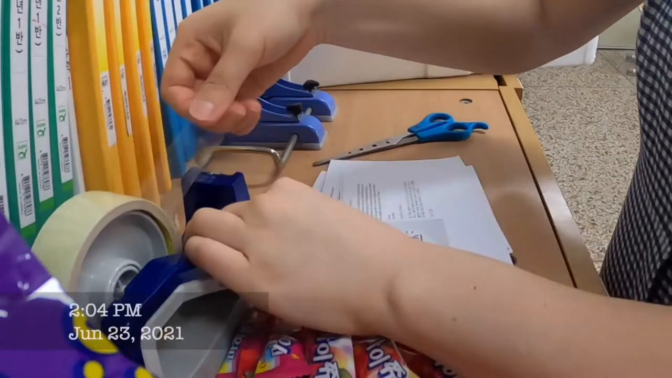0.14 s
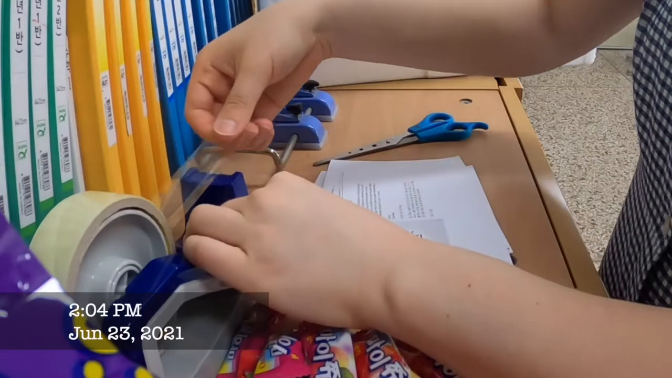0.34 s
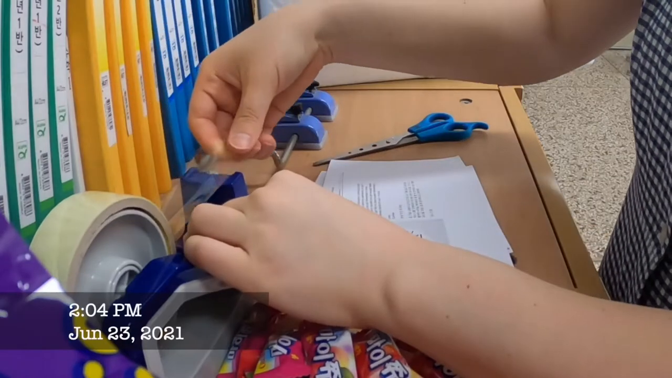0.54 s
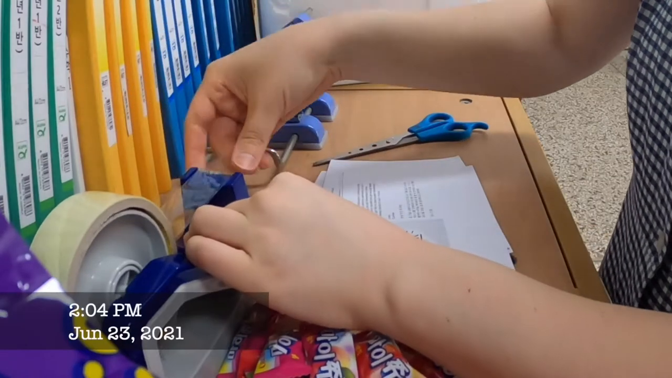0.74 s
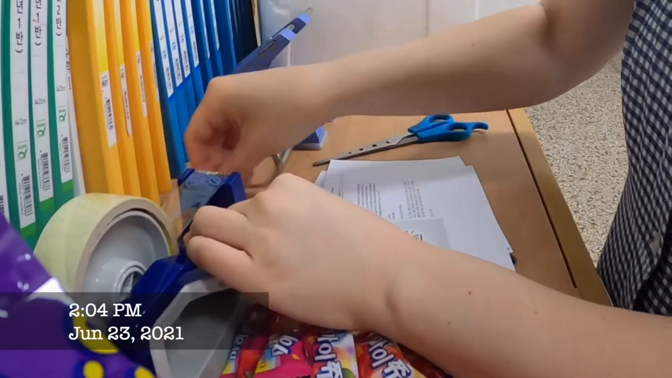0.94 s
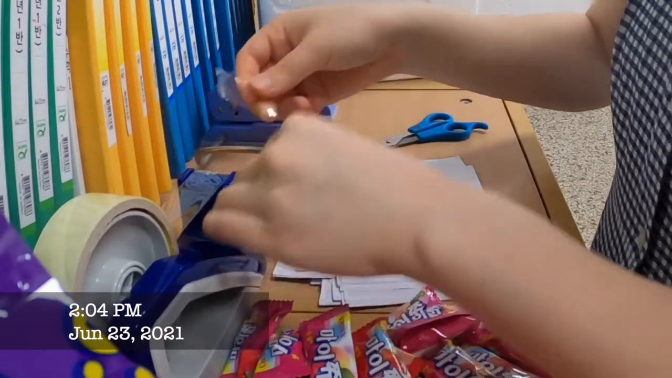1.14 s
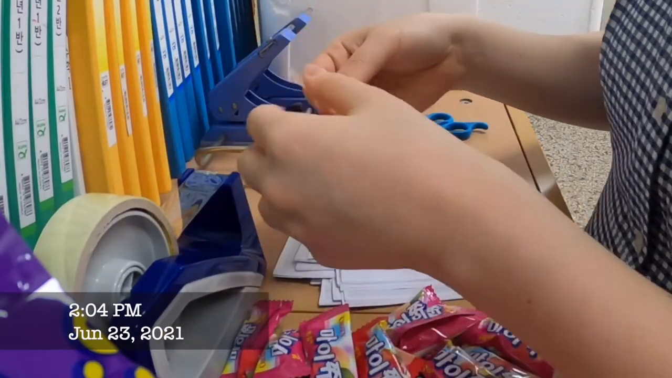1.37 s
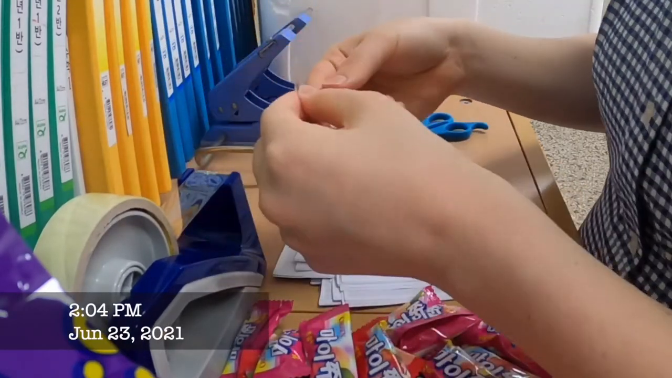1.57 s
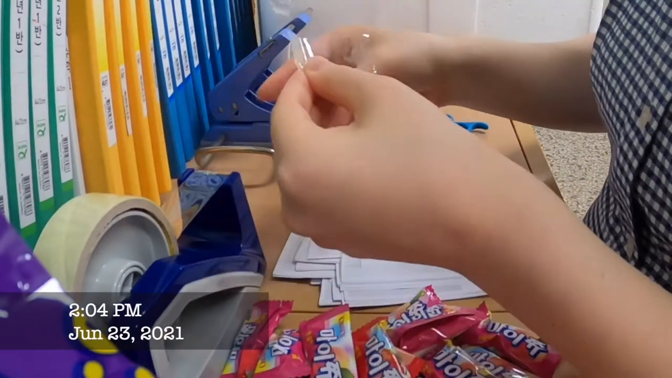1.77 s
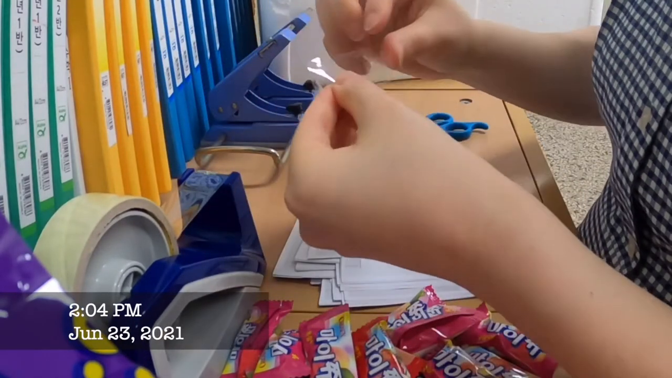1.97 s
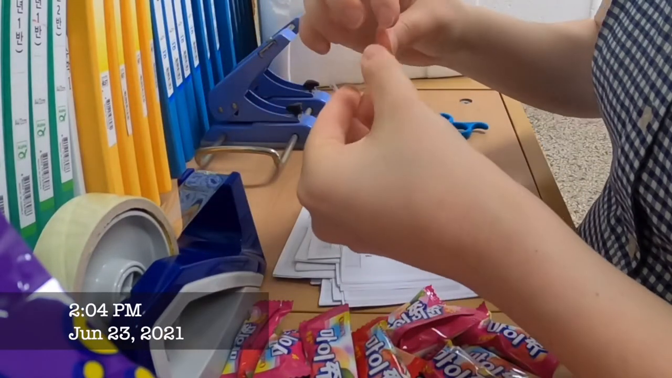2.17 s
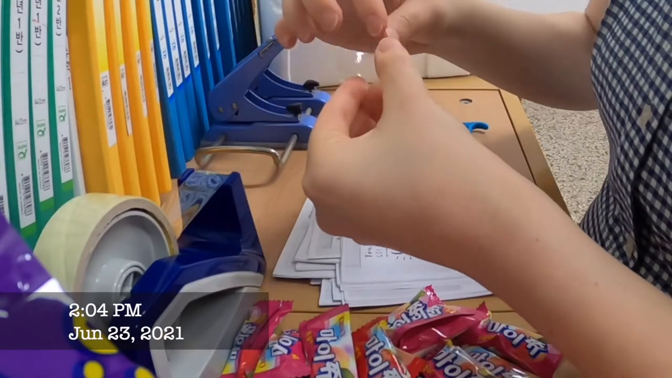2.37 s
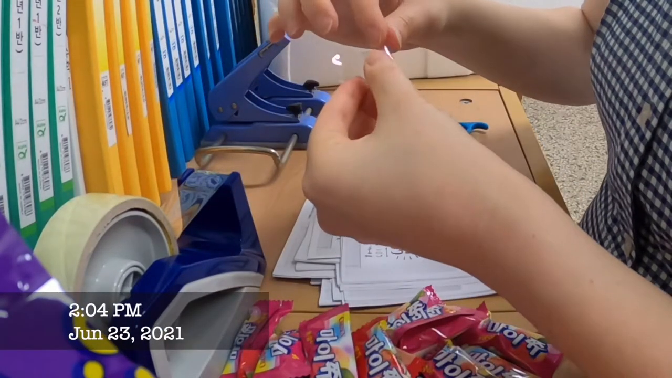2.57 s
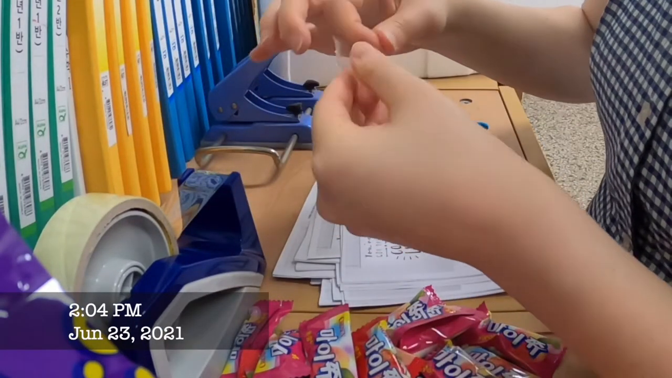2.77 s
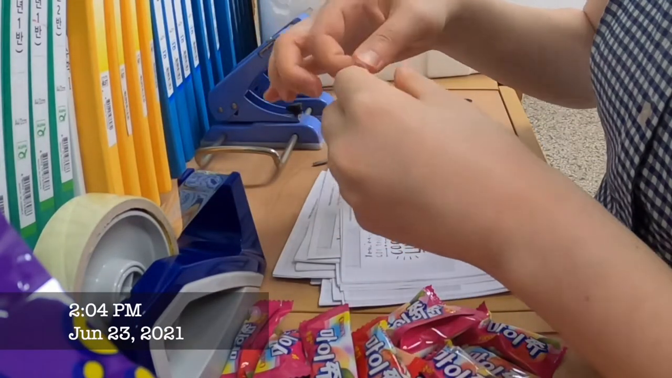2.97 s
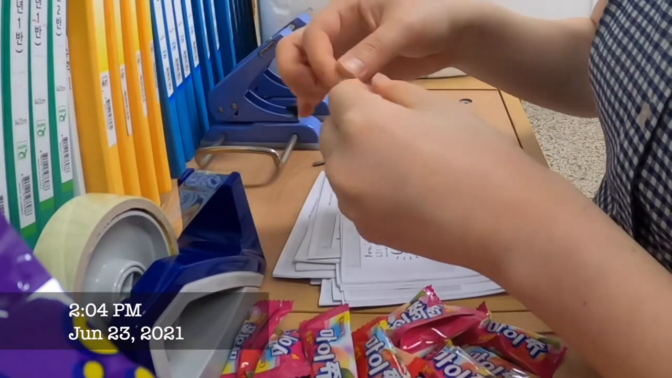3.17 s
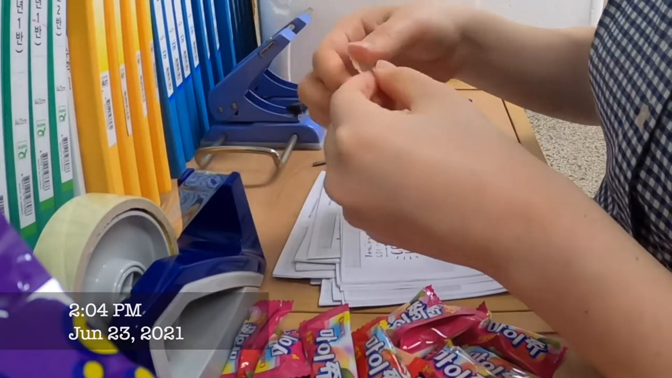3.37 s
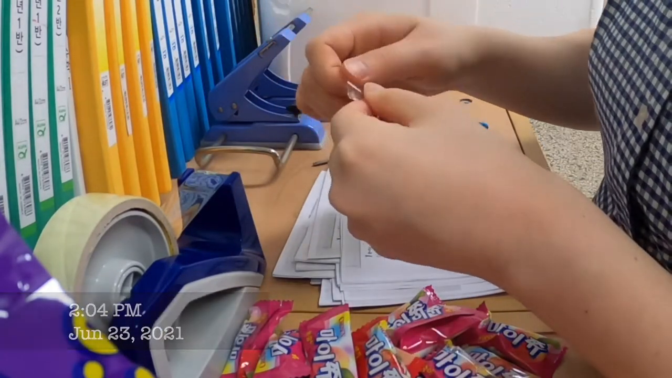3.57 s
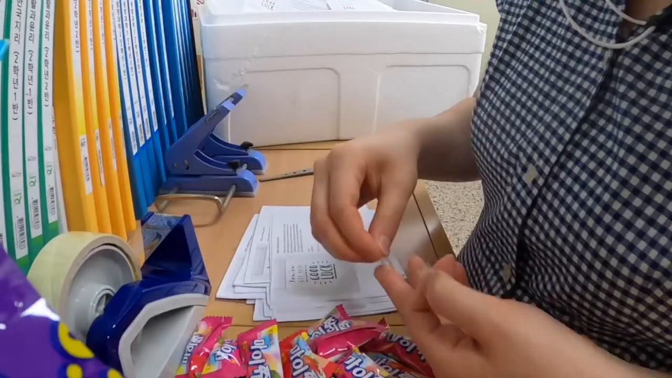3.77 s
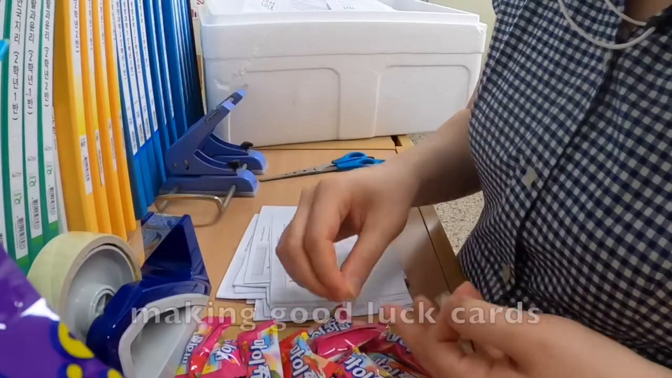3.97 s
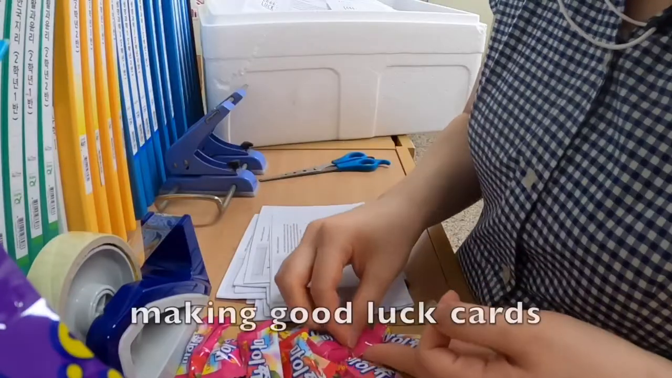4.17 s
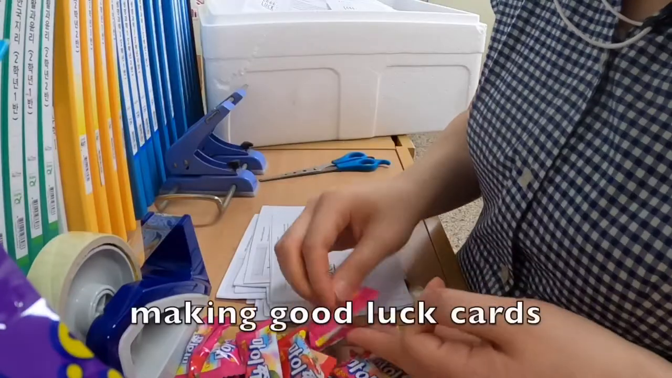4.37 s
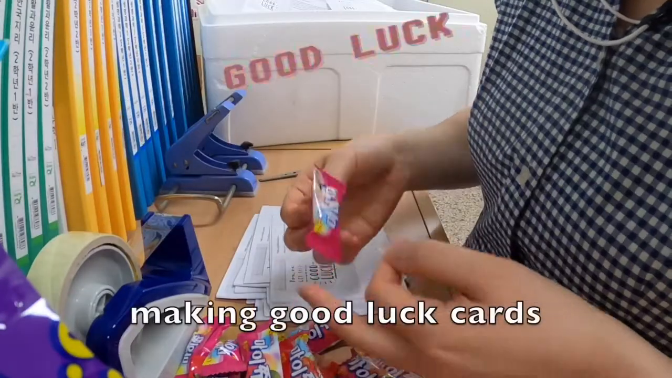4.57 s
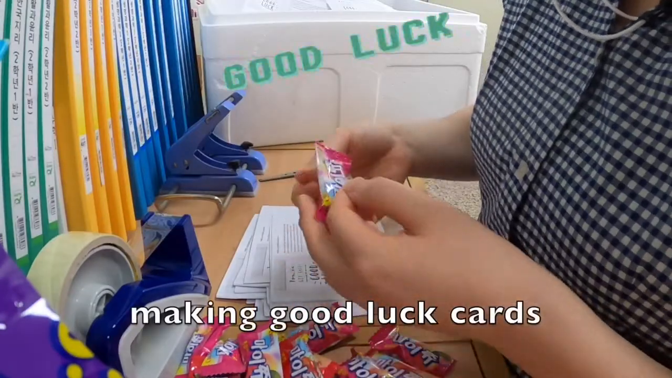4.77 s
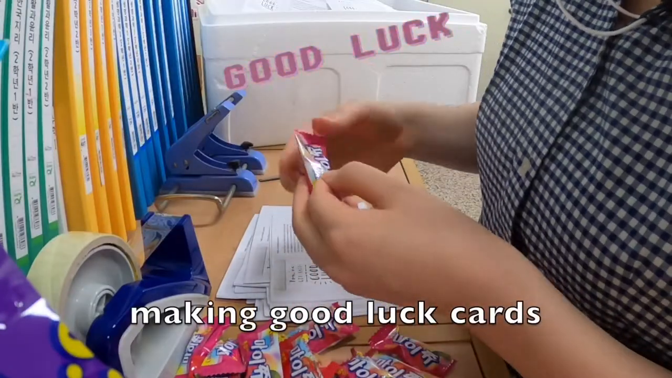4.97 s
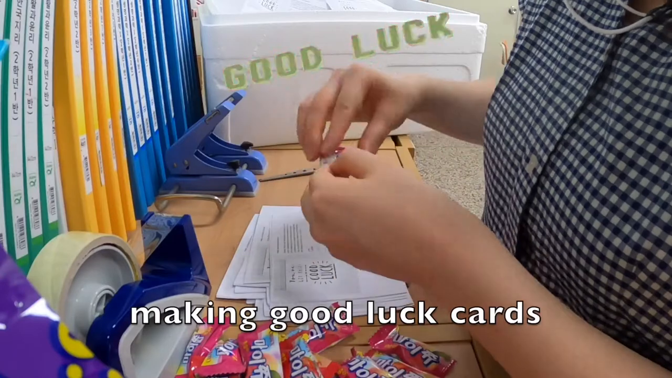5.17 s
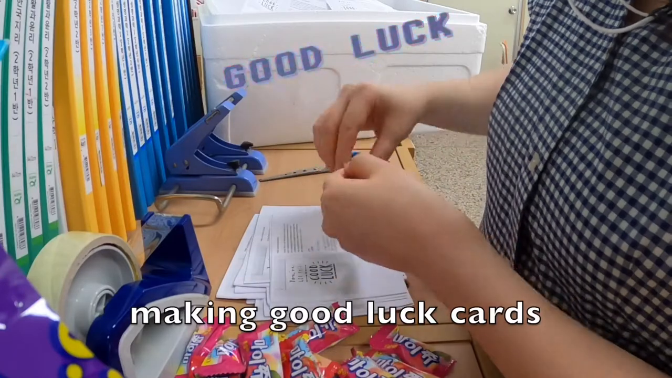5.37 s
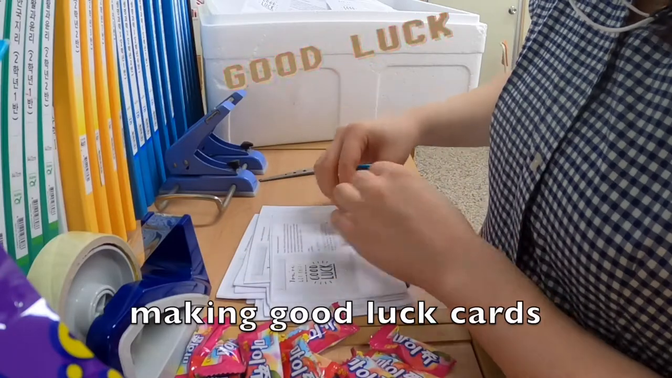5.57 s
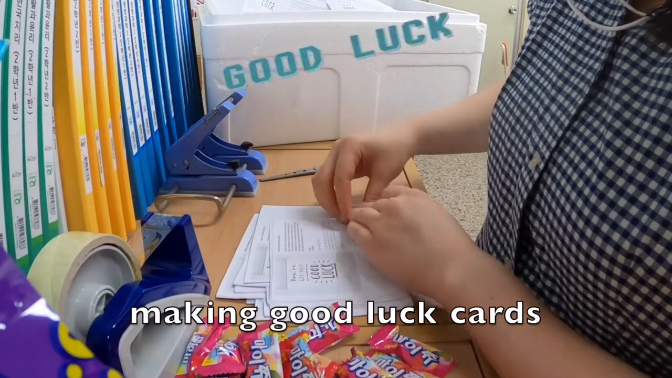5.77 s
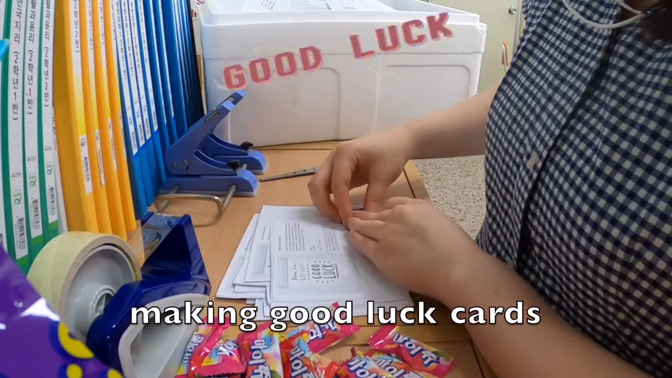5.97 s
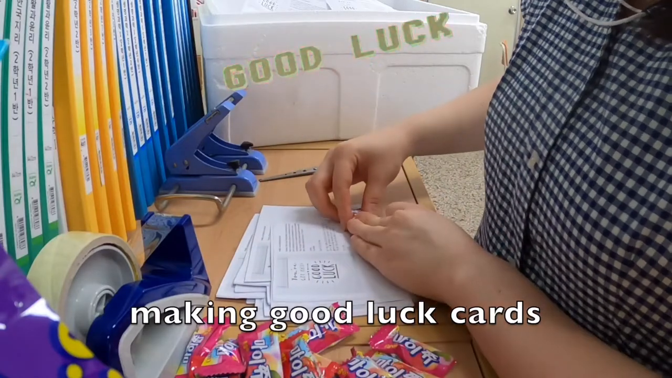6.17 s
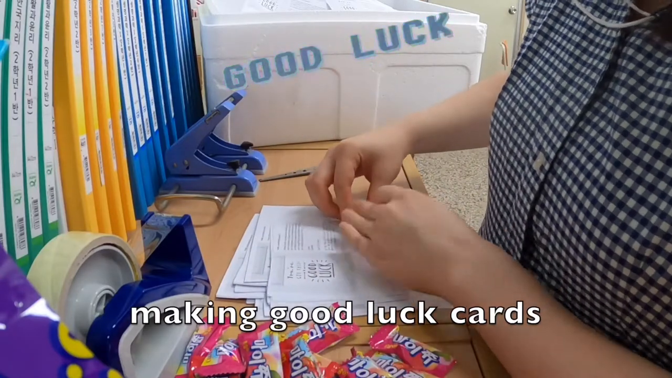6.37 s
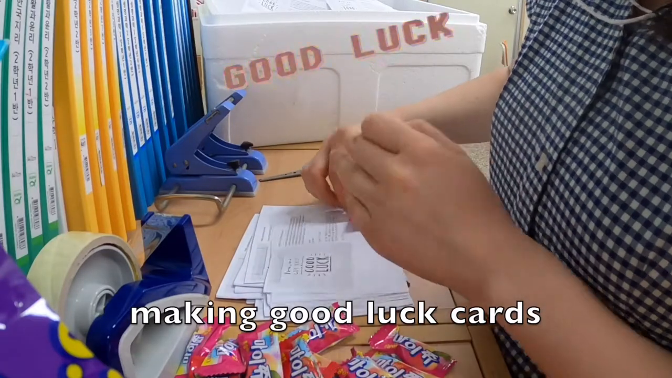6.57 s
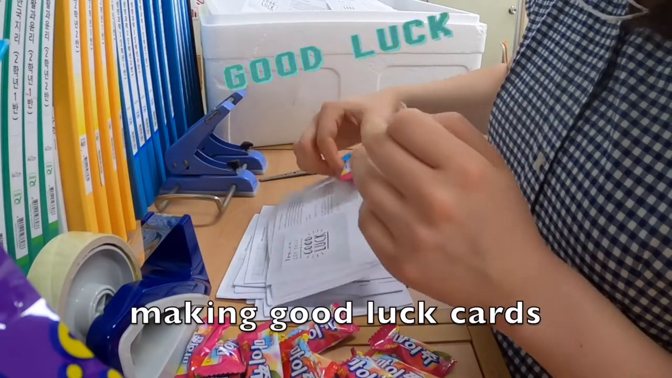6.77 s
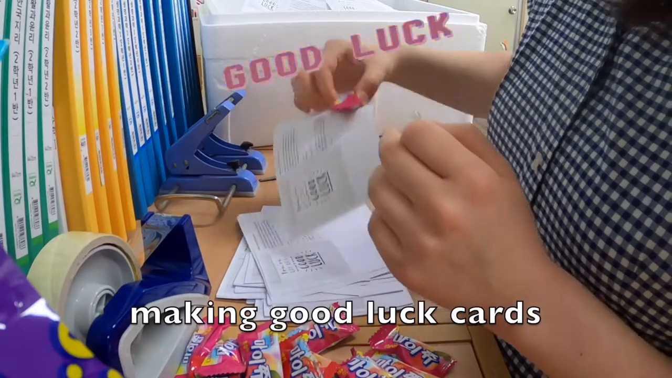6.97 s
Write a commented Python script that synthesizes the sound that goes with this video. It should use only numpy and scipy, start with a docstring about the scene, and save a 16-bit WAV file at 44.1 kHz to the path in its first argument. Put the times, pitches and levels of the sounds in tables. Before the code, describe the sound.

In a small office, clear tape is pulled off a plastic desk dispenser with a brief crackling rip, rocking it against the desk. The strip snaps on the cutter with a thud. Faint ticks and rubs follow as fingers handle the tape. Then plastic candy wrappers crinkle sharply, easing into scattered crackles and soft paper rustling. Everything sounds close, over a low ventilation hum.

```python
"""Clear tape pulled off a plastic desk dispenser and snapped on its cutter, in a small office.
The glue sticks and slips; each slip cracks the tape and rings the dispenser, which rocks on the desk.
Fingers then loop the strip, pick a wrapped sweet from a pile and press it on a paper card.
Film facets buckle and tick, sliding films catch in tiny grains, and the ventilation hums throughout."""
import sys
import numpy as np
from scipy import signal
from scipy.fft import rfft, irfft
from scipy.io import wavfile

SR = 44100
rng = np.random.default_rng(int(sys.argv[2]) if len(sys.argv) > 2 else 0)


def bounce(signal):
    """Save signal as a 16-bit WAV file at the path given by the first command-line argument."""
    frames = np.transpose(np.atleast_2d(signal))
    limited = np.clip(frames, -1, 1)
    pcm = np.round(limited * 32767).astype(np.int16)
    wavfile.write(sys.argv[1], SR, pcm)


N = 309582

# Ventilation air. Each row: frequency in Hz, relative spectral density in dB.
AIR_SPECTRUM = [(20, -13.5), (40, -8.5), (55, 0), (75, -0.5), (120, -4), (200, -6.5), (270, -15.5),
                (450, -17.5), (600, -25.5), (1100, -23.5), (2200, -34.5), (4000, -37.5), (7000, -39),
                (16000, -64.5)]
# Ventilation motor. Each row: frequency in Hz, RMS level in dB.
MOTOR_HUM = [(59.2, -61.5), (118.4, -62)]
# Fingers on tape and paper. Each row: start and end in seconds, level in dB, tilt in dB/octave.
FINGER_STROKES = [(0, 0.078, -54.5, -0.5), (0.663, 0.757, -59, 2), (1.031, 1.157, -62, -2.5),
                  (1.499, 1.67, -66, -4), (1.623, 1.762, -57.5, -0.5), (2.605, 2.757, -65.5, -1.5),
                  (2.904, 2.997, -65.5, -4.5), (3.214, 3.269, -56.5, 2.5), (3.322, 3.458, -58.5, -6),
                  (3.527, 3.717, -64, -6), (6.044, 6.43, -63, -5), (6.847, 7.024, -60, -1)]
# Radiation of wrapper film, also used for all rubbing. Each row: frequency in Hz, gain in dB.
WRAPPER_SPECTRUM = [(150, -26.5), (400, -3.5), (750, -7), (1100, 3.5), (1500, 1), (2500, 3.5), (4000, 2.5),
                    (6000, 0), (8000, -3), (10000, -8), (13000, -18), (16000, -34.5)]
# Radiation of tape. Each row: frequency in Hz, gain in dB.
TAPE_SPECTRUM = [(70, -21), (300, 4), (1000, 5), (1500, 5), (4000, 0), (6000, 1.5), (8000, -2),
                 (10000, -11), (13000, -17.5), (16000, -26.5)]
# Dispenser and desk. Each row: frequency in Hz at pitch ratio 1, relative level in dB, T60 in seconds.
DISPENSER_MODES = [(140.9, -7, 0.088), (191.6, -0.5, 0.081), (195, -11.5, .2), (239, -3.5, 0.052),
                   (324, 0, 0.056), (430, -8.5, .07), (590, -6.5, 0.054), (735, 0.5, 0.037),
                   (1174, -5.5, 0.069), (1264, 2.5, 0.035), (1800, -16, .04), (2340, -8.5, .04),
                   (2688, -1, 0.055), (3640, -6.5, 0.021)]
# Tape tugging the dispenser. Each row: start in seconds, peak in dB.
TAPE_TUGS = [(0.012, -32), (0.0716, -21), (0.1932, -13), (0.2229, -16), (0.284, -20)]
# Lone slips around the fast pull. Each row: start in seconds, energy in dB, ring in Hz, tilt in dB/octave.
LONE_SLIPS = [(0.0658, 0, 6370, 0), (0.0944, -1.5, 5880, 0.5), (0.1305, 1, 2697, 0.5), (0.143, -1, 4420, 1),
              (0.2727, 0.5, 4130, -1)]
# Course of the fast pull. Each row: time in seconds, slips per second, slip energy in dB.
FAST_PULL = [(0.151, 150, -4), (0.162, 220, -2.8), (0.174, 244, -1), (0.197, 205, -3), (0.234, 195, -3),
             (.268, 182, -6)]
# Dispenser landings. Each row: thud time in seconds, peak in dB, pitch ratio, edge lead in seconds.
LANDINGS = [(0.3672, -15.5, 0.854, 0.00094), (.9418, -9, 1.05, 0.00322)]
# Strip on cutter and fingers. Each row: start in seconds, energy in dB, ring in Hz.
STRIP_TICKS = [(.73, -14.5, 5230), (0.8343, -30.5, 3500), (.8975, -30, 3870), (1.5369, -27, 3000),
               (1.573, -31, 2960), (1.6703, -13.5, 4170), (1.7315, -12.5, 8800), (2.107, -32.5, 2830),
               (2.2796, -33, 2870), (2.606, -33, 6810), (2.8367, -23.5, 3500), (2.9277, -34, 3280),
               (3.2343, -29.5, 3460), (3.2415, -21, 5500), (3.2616, -27.5, 1255), (3.4903, -32, 4370),
               (3.694, -34, 8930)]
# Big creases of wrappers and card. Each row: start in seconds, energy in dB, ring in Hz.
BIG_CREASES = [(4.1083, -29, 4000), (4.1384, -4, 4300), (4.147, -7, 3580), (4.1644, -2, 1900),
               (4.188, -4.5, 3180), (4.2252, -15, 3600), (4.294, -12.5, 2800), (4.3335, -11.5, 3480),
               (4.4093, -18, 7260), (4.437, -15, 1580), (4.5028, -16, 1480), (4.5569, -18.5, 5240),
               (4.565, -12, 3800), (4.6168, -15.5, 4630), (4.6505, -19.5, 11400), (4.757, -13.5, 7000),
               (4.7735, -22, 5450), (4.9049, -27.5, 3480), (5.036, -23, 7250), (5.3232, -26, 6500),
               (5.3809, -17.5, 2000), (5.3995, -18, 9600), (5.4414, -16, 6600), (5.558, -30, 1180),
               (5.6297, -29.5, 2450), (5.7186, -22.5, 2150), (5.7893, -12.5, 4230), (5.8349, -14, 6940),
               (5.8569, -11, 6000), (6.0217, -13, 4900), (6.1445, -20, 1050), (6.3989, -13.5, 1130),
               (6.4423, -17, 7000), (6.501, -16.5, 2660), (6.6885, -23.5, 1180), (6.7512, -19, 6860)]
# Fingers squeezing a wrapper. Each row: start and end in seconds, grip level in dB.
SQUEEZES = [(4.116, 4.231, -37.5), (4.272, 4.381, -42.5), (4.39, 4.522, -49.5), (4.576, 4.681, -62),
            (4.956, 5.05, -62.5), (5.19, 5.297, -62), (5.319, 5.471, -54.5), (5.698, 5.93, -56.5),
            (5.966, 6.061, -56), (6.37, 6.531, -53.5)]
# Office reverberation. Each row: band centre in Hz, level in dB, T60 in seconds.
ROOM_BANDS = [(57.8, -16.5, 0.94), (140, -11, 0.39), (350, -15, 0.25), (1003.5, -12, 0.32),
              (2013, -12.5, 0.54), (3780, -9, 0.56), (7000, -13.5, 0.65), (16000, -8.5, 0.26)]
# Reflections off desk and files. Each row: delay in seconds, linear gain.
NEAR_ECHOES = [(.0025, 0.049), (.0098, 0.14)]


def undb(db):
    """Decibels to gain."""
    return 10 ** (np.asarray(db) / 20)


def add(out, start_s, sound):
    """Mix a sound in at start_s."""
    i = max(int(start_s * SR), 0)
    part = sound[..., :max(N - i, 0)]
    out[..., i:i + part.shape[-1]] += part


def bins_hz(size):
    """FFT frequencies, floored at 1 Hz."""
    return np.maximum(np.arange(size // 2 + 1) * SR / size, 1)


def contour(points, hz):
    """Interpolate (Hz, value) points over log frequency."""
    knots_hz, values = np.transpose(points)
    return np.interp(np.log(hz), np.log(knots_hz), values)


def minimum_phase(gain_db, size):
    """Spectrum with these gains that rings only after the blow."""
    cepstrum = irfft(np.log(undb(gain_db)), size)
    cepstrum[1:size // 2] *= 2
    cepstrum[size // 2 + 1:] = 0
    return np.exp(rfft(cepstrum))


def stereo(mid, side, hz, left_lag_s, apart_hz=23000, right_db=1.5, min_spread=.11):
    """Spectra at two close points: alike in the bass, less related and more panned in the treble."""
    spread = np.clip(hz / apart_hz, min_spread, 1)
    lean = undb(right_db * spread)
    left = (mid + spread * side) * np.exp(-2j * np.pi * hz * left_lag_s) / lean
    right = (mid - spread * side) * lean
    return np.array([left, right]) / np.sqrt(1 + spread ** 2)


def ventilation(air_db=-55):
    """Low steady rush of air over the motor's hum."""
    hz, t = bins_hz(N), np.arange(N) / SR
    mid, side = rfft(rng.standard_normal((2, N)))
    spectra = stereo(mid, side, hz, 0, apart_hz=2980, right_db=-0.5, min_spread=0.16)
    air = irfft(spectra * undb(contour(AIR_SPECTRUM, hz)), N)
    hum = sum(undb(db) * np.sqrt(2) * np.sin(2 * np.pi * (hum_hz * t + rng.random()))
              for hum_hz, db in MOTOR_HUM)
    return air * undb(air_db) / np.sqrt(np.mean(air ** 2)) + hum


def facet(film, size, ring_hz, tilt_db_oct, ring_db=7.5, width_oct=0.16, leak=0.18):
    """Response of one film facet: a resonance, and bass lost as air slips round it."""
    hz = bins_hz(size)
    resonance_db = ring_db / (1 + (np.log2(hz / ring_hz) / width_oct) ** 2)
    leak_db = -10 * np.log10(1 + (leak * ring_hz / hz) ** 2)
    slope_db = tilt_db_oct * np.log2(np.maximum(hz, 800))
    return minimum_phase(contour(film, hz) + resonance_db + leak_db + slope_db, size)


def rub(length_s, db, tilt_db_oct, spread_oct=1.46, grains_per_s=220, scatter_db=0.5, facets=5):
    """Sliding films catch in tiny grains on a few facets, each with its own pitch."""
    size = 16384
    hz = bins_hz(size)
    stroke = signal.windows.tukey(int(np.clip(length_s * SR, 64, size)), 0.42)
    swish = undb(-54 - db / 2)  # a lighter touch glides more smoothly
    spectra = 0
    # duller strokes move larger, lower facets
    for ring_hz in 3200 * 2 ** (tilt_db_oct / 6 + spread_oct * rng.uniform(-1, 1, facets)):
        caught = rng.random(size) < grains_per_s / SR
        strength = caught * undb(scatter_db * np.minimum(rng.exponential(size=size), 4)) + swish
        grains = strength * rng.standard_normal((2, size))
        mid, side = rfft(grains[:, :len(stroke)] * stroke, size)
        colour = facet(WRAPPER_SPECTRUM, size, ring_hz, tilt_db_oct)
        spectra = spectra + stereo(mid, side, hz, left_lag_s=35e-6) * colour
    sound = irfft(spectra)
    return sound * undb(db) * np.sqrt(2 * np.sum(stroke ** 2) / np.sum(sound ** 2))


def finger_strokes():
    """Light strokes leave the film flat, so its facets ring closer in pitch."""
    out = np.zeros((2, N))
    for start_s, end_s, db, tilt_db_oct in FINGER_STROKES:
        add(out, start_s, rub(end_s - start_s, db, tilt_db_oct, spread_oct=1.0))
    return out


def knock(pitch_ratio, contact_s=0.0023, low_cut_hz=140):
    """Dispenser and desk modes after one push, peak 1; longer contact is duller."""
    t = np.arange(SR // 2) / SR
    modes = sum(undb(db) * np.sin(2 * np.pi * hz * pitch_ratio * t) * np.exp(-np.log(1000) * t / t60_s)
                for hz, db, t60_s in DISPENSER_MODES)
    push = np.sin(np.pi * np.minimum(t / contact_s, 1)) * np.exp(-t / contact_s)
    # a small body radiates no deep bass
    radiation = signal.butter(3, low_cut_hz, "high", fs=SR, output="sos")
    sound = signal.sosfilt(radiation, signal.fftconvolve(modes, push)[:len(t)])
    return sound / np.abs(sound).max()


def dispenser_rocking():
    """Each tug rocks the dispenser on its soft feet."""
    out = np.zeros((2, N))
    for start_s, db in TAPE_TUGS:
        add(out, start_s, undb(db) * knock(pitch_ratio=0.86))
    return out


def snap(film, energy_db, ring_hz, tilt_db_oct, fall_s, flutter_gain, left_lag_s=0):
    """A film facet jumps: sharp crack, then weaker flutter."""
    size, rise_s, flutter_s = 2048, 0.00052, 0.0037
    t = np.arange(size) / SR
    rise = 1 - np.exp(-t / rise_s)  # softens the start of each click
    fall = np.exp(-t / fall_s) + flutter_gain * np.exp(-t / flutter_s)
    mid, side = rfft(rng.standard_normal((2, size)) * rise * fall)
    spectra = stereo(mid, side, bins_hz(size), left_lag_s)
    sound = irfft(spectra * facet(film, size, ring_hz, tilt_db_oct))
    return sound * undb(energy_db) / np.sqrt(np.sum(sound ** 2) / 2)


def tape_pull(jitter=.06, scatter_db=0.5, lone_shake_db=-27, fast_shake_db=-19):
    """Glue sticks and slips at the hand's pace; each slip cracks the tape and rings the dispenser."""
    out = np.zeros((2, N))
    shake = knock(pitch_ratio=0.99, contact_s=0.00047)
    for start_s, db, ring_hz, tilt_db_oct in LONE_SLIPS:
        add(out, start_s, snap(TAPE_SPECTRUM, db, ring_hz, tilt_db_oct, fall_s=0.0016, flutter_gain=.1))
        add(out, start_s, shake * undb(db + lone_shake_db))
    times_s, slips_per_s, energies_db = np.transpose(FAST_PULL)
    start_s = times_s[0]
    for late, loud, high in rng.standard_normal((32, 3)):
        db = np.interp(start_s, times_s, energies_db) + scatter_db * loud
        ring_hz = 4500 * 2 ** (.5 * high)
        crack = snap(TAPE_SPECTRUM, db, ring_hz, tilt_db_oct=0.54, fall_s=0.002, flutter_gain=.5)
        if start_s < times_s[-1]:
            add(out, start_s, crack)
            add(out, start_s, shake * undb(db + fast_shake_db))
        start_s += (1 + jitter * late) / np.interp(start_s, times_s, slips_per_s)
    return out


def dispenser_landings(edge_db=-13, settle_db=-15, settle_s=0.0166):
    """The dispenser drops back after pull and cut: a hard edge clicks, the body thuds, then settles."""
    out = np.zeros((2, N))
    for thud_s, db, pitch_ratio, lead_s in LANDINGS:
        add(out, thud_s - lead_s, undb(db + edge_db) * knock(1.01, contact_s=0.00021))
        add(out, thud_s, undb(db) * knock(pitch_ratio))
        add(out, thud_s + settle_s, undb(db + settle_db) * knock(0.93, contact_s=0.0044))
    return out


def tape_tick(db, ring_hz):
    """One snap of soft tape; smaller facets ring higher and brighter."""
    tilt_db_oct = 1.6 * np.log2(ring_hz / 4540)
    return snap(TAPE_SPECTRUM, db, ring_hz, tilt_db_oct, fall_s=0.0024, flutter_gain=.19, left_lag_s=1e-5)


def tape_cut(cut_s=.9399, last_db=-3, last_hz=830, last_gap_s=.0018, step_db=7, step_oct=0.42):
    """The strip scrapes, then tears tooth by tooth: faster, louder, lower. The last rings the dispenser."""
    out = np.zeros((2, N))
    for teeth_left in range(4):
        tear = tape_tick(last_db - step_db * teeth_left, last_hz * 2 ** (step_oct * teeth_left))
        add(out, cut_s - last_gap_s * teeth_left ** 2, tear)
    add(out, cut_s, undb(last_db - 15) * knock(1.01, contact_s=0.00035))
    add(out, cut_s - .021, rub(length_s=.042, db=-38, tilt_db_oct=-1.5))
    return out


def crease(db, ring_hz):
    """One snap of stiffer wrapper film: a shorter crack than the tape's."""
    tilt_db_oct = 1.1 * np.log2(ring_hz / 4420)
    return snap(WRAPPER_SPECTRUM, db, ring_hz, tilt_db_oct,
                fall_s=0.00042, flutter_gain=.19, left_lag_s=3e-5)


def wrapper_squeezes(usual_db=-53, scatter_db=2.5, centre_hz=4600, spread_oct=0.83, creases=9):
    """Each squeeze rubs the wrapper and tips small creases unevenly; firmer is louder, its rub brighter."""
    out = np.zeros((2, N))
    for start_s, end_s, db in SQUEEZES:
        length_s, grip_db = end_s - start_s, db - usual_db
        add(out, start_s, rub(length_s, db - 1.5, tilt_db_oct=-1.9 + 0.1 * grip_db))
        times_s = start_s + length_s * (np.arange(creases) + rng.random(creases)) / creases
        for time_s, (loud, high) in zip(times_s, rng.standard_normal((creases, 2))):
            crease_db = -28 + 0.61 * grip_db + scatter_db * loud
            add(out, time_s, crease(crease_db, centre_hz * 2 ** (spread_oct * high)))
    return out


def sweet_tap(start_s=4.996, peak_db=-41):
    """A sweet taps the desk, higher than the dispenser."""
    out = np.zeros((2, N))
    add(out, start_s, undb(peak_db) * knock(pitch_ratio=2.3))
    return out


def place_snaps(events, sound):
    """One film snap per table row."""
    out = np.zeros((2, N))
    for start_s, db, ring_hz in events:
        add(out, start_s, sound(db, ring_hz))
    return out


def office(dry, build_s=0.0041):
    """Near surfaces echo at once; a diffuse tail follows, longest in the deep bass."""
    hz, t = bins_hz(SR), np.arange(SR) / SR
    mid, side = rfft(rng.standard_normal((2, SR)))
    diffuse = stereo(mid, side, hz, 0, apart_hz=2500, right_db=-1, min_spread=.35)
    centres_hz = [row[0] for row in ROOM_BANDS]
    response = np.zeros((2, SR))
    for share, (_, db, t60_s) in zip(np.eye(len(ROOM_BANDS)), ROOM_BANDS):
        fade = np.exp(-np.log(1000) * t / t60_s) * (1 - np.exp(-t / build_s))
        band = irfft(diffuse * np.interp(np.log(hz), np.log(centres_hz), share), SR)
        response += undb(db) * band * fade / np.sqrt(np.sum(fade ** 2))
    for delay_s, gain in NEAR_ECHOES:
        response[:, int(delay_s * SR)] += gain
    return dry + signal.fftconvolve(dry, response, axes=1)[:, :N]


def scene(wrapper_right_db=1.5):
    """Tape, knocks and wrappers in the office, over the ventilation."""
    tape = tape_pull() + tape_cut() + place_snaps(STRIP_TICKS, tape_tick) + finger_strokes()
    knocks = dispenser_rocking() + dispenser_landings() + sweet_tap()
    wrappers = place_snaps(BIG_CREASES, crease) + wrapper_squeezes()
    pan = undb(wrapper_right_db * np.array([[-.5], [.5]]))
    return office(tape + knocks + wrappers * pan) + ventilation()


def record(dry, top_hz=16300):
    """Steep low-pass on the top treble."""
    return signal.sosfilt(signal.ellip(8, .2, 70, top_hz, fs=SR, output="sos"), dry)


dry = scene()
out = record(dry)
bounce(out)
```